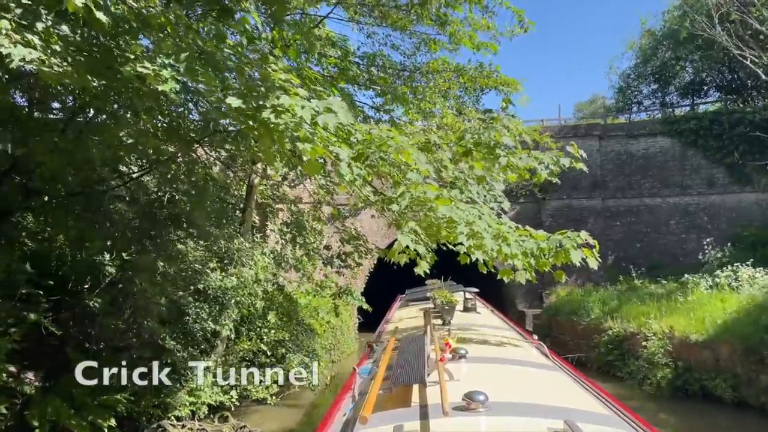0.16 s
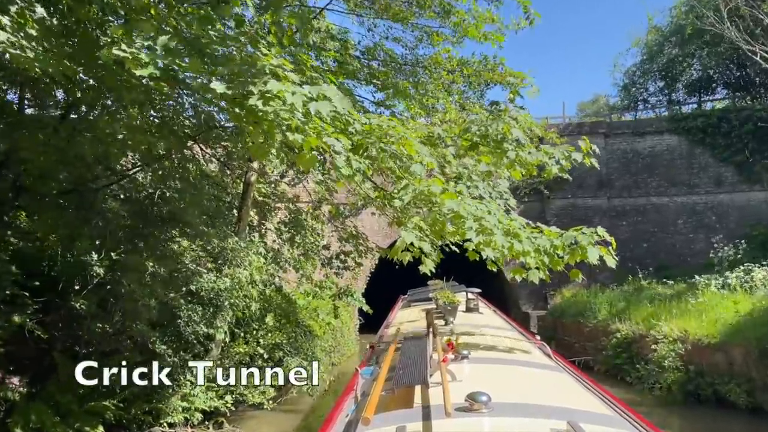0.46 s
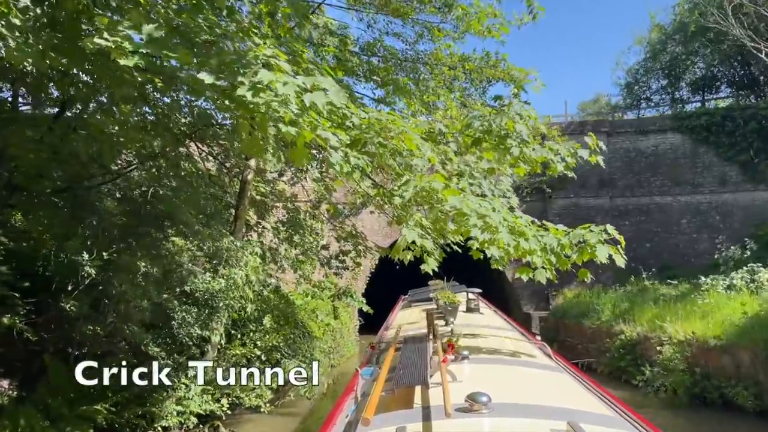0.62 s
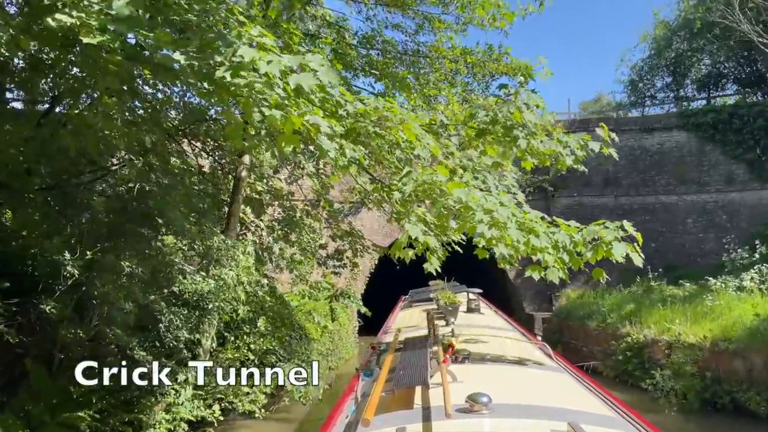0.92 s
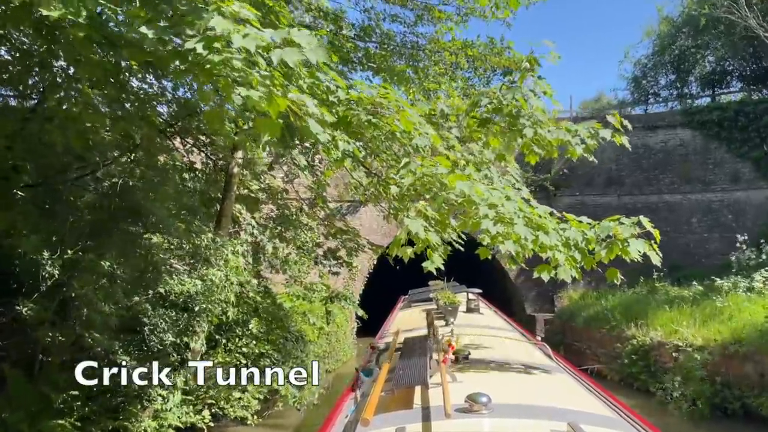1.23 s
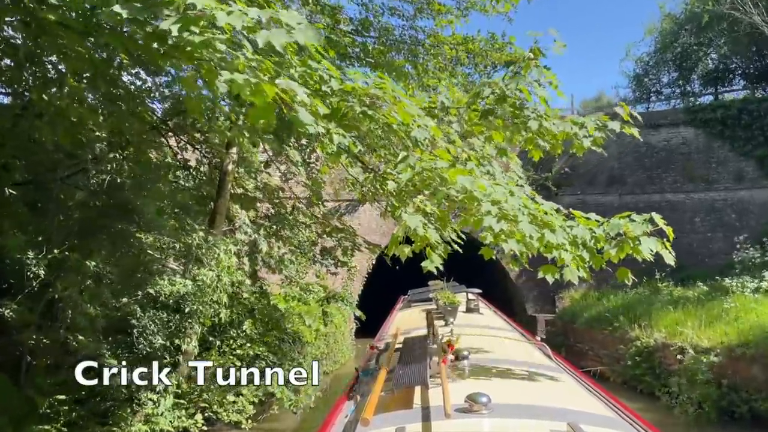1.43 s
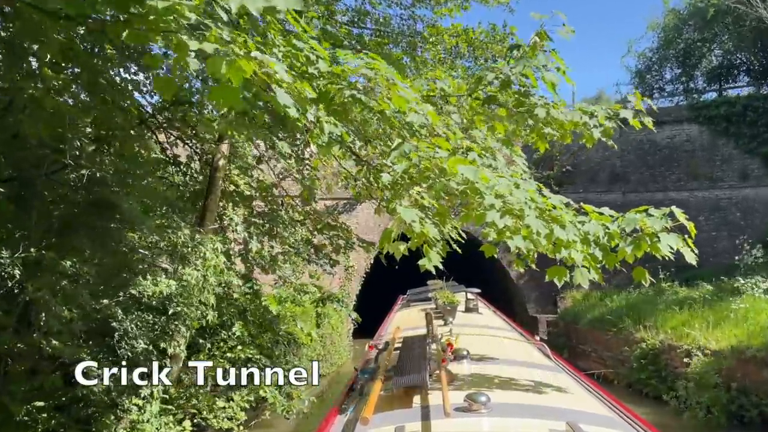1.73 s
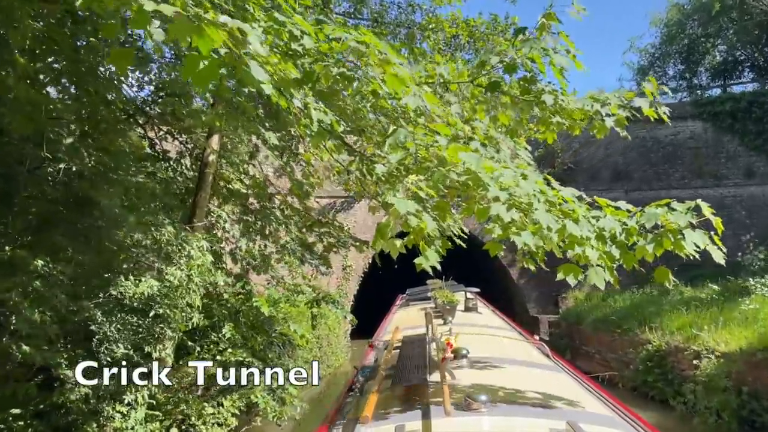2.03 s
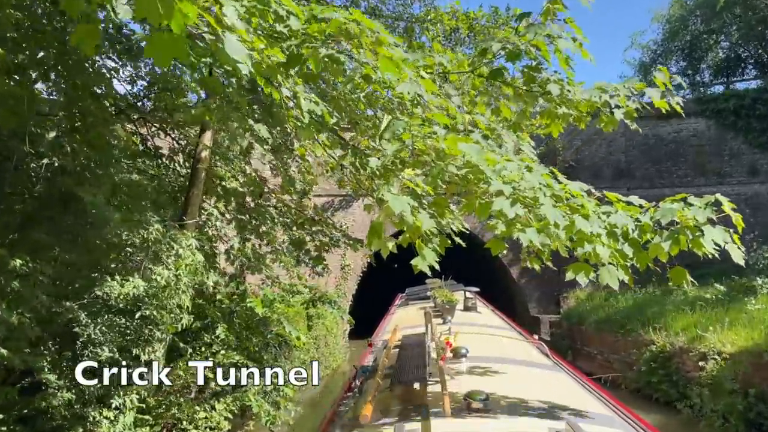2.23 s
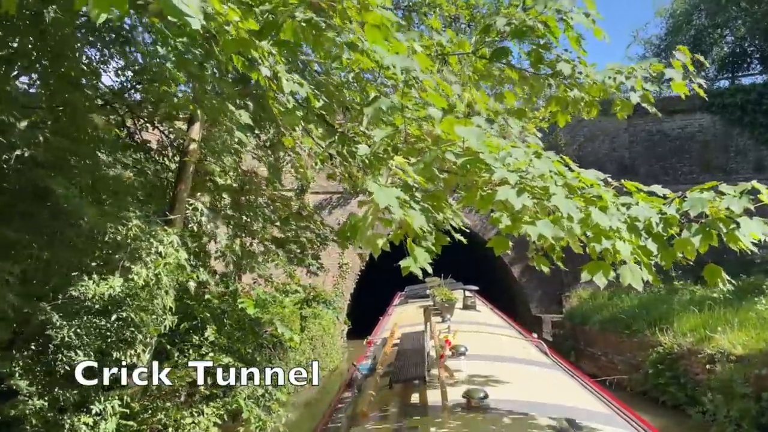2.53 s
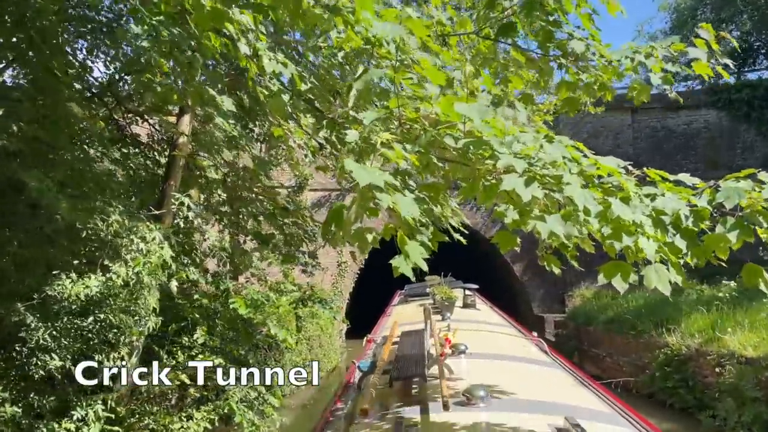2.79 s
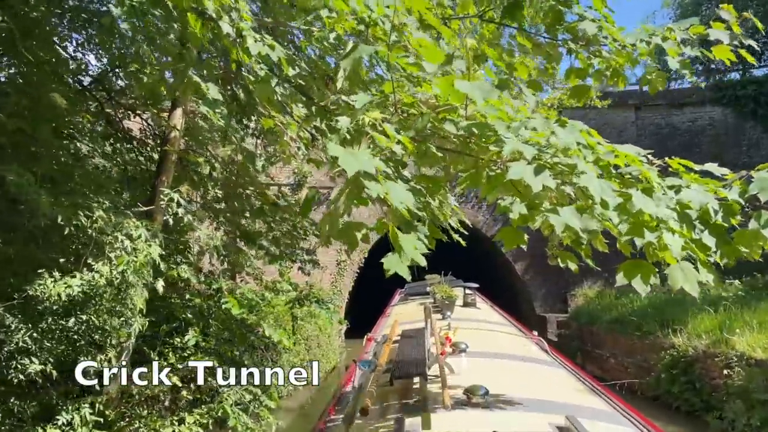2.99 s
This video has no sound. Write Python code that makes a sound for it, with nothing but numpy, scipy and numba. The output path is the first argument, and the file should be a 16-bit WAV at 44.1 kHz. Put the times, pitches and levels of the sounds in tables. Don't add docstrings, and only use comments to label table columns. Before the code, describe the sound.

A canal boat's diesel engine drones low and steady throughout, about ten rapid pops a second, with light irregular metallic ticks. Cooling water gurgles and gulps, busiest around 0.7-1.2 s and again near 2.6 and 3.1 s, over soft hissing wash. From 1.6 s pops harden until 2.4 s, a hollow exhaust ring grows and bass widens. Three faint thin bird whistles come at 2.25, 2.5 and 2.75 s.

```python
import sys
import numpy as np
from scipy import signal
from scipy.fft import rfft, irfft
from scipy.io import wavfile
from scipy.ndimage import uniform_filter1d
from numba import njit

SR = 44100
rng = np.random.default_rng(int(sys.argv[2]) if len(sys.argv) > 2 else 0)


def materialize(psi):
    bounded = np.clip(np.atleast_2d(psi).T, -1, 1)
    quanta = np.round(bounded * 32767).astype(np.int16)
    wavfile.write(sys.argv[1], SR, quanta)


def volts_from_db(level):
    exponent = np.asarray(level, float) / 20
    return 10 ** exponent


N = 138915
CYCLE_HZ, CYCLE_START_S = 9.716, 0.0065

# time in seconds, level in dB.
GURGLE_EFFORT = [(0.0, -43.5), (0.27, -62), (0.31, -43.5), (0.66, -52.5), (0.67, -45), (0.82, -44.5),
                 (0.96, -48), (1.0, -41), (1.13, -47.5), (1.46, -51.5), (1.73, -45), (2.34, -47.5),
                 (3.12, -44), (3.15, -47)]
# time in seconds, wash level in dB, bay level in dB.
NARROWING = [(0, 7.5, -2), (.05, 1.5, 9.5), (.15, -0.5, -2.5), (.27, 1, 3), (1.2, 0.5, 1.5),
             (2.09, 0, -3.5), (2.15, 0, 13), (2.22, 0, 2), (2.35, -1, 5), (2.44, -1, 2.5), (2.55, 0, 9),
             (2.88, -1, -2.5), (3.08, -1, 9.5), (3.15, -1, 3)]


def level(x, db):
    return x * volts_from_db(db) / np.sqrt(np.mean(x ** 2))


def walk(rate):
    hold = int(SR / rate)
    steps = np.repeat(rng.standard_normal(N // hold + 1), hold)
    return 0.82 * uniform_filter1d(uniform_filter1d(steps, hold), hold)[:N]


def curve(points):
    return np.interp(np.arange(N) / SR, *np.array(points).T)


def bell(hz, octaves):
    f = np.arange(1, N // 2 + 2) * SR / N
    return np.exp(-0.5 * (np.log2(f / hz) / octaves) ** 2)


def band(hz, octaves):
    return irfft(rfft(rng.standard_normal(N)) * bell(hz, octaves), N)


@njit
def grains(rows, n):
    out = np.zeros(n)
    for start, gain, hz, t60, glide, rise in rows:
        phase = 0.
        first = int(start * SR)
        for i in range(min(int(t60 * SR), n - first)):
            u = i / SR
            phase += 2 * np.pi * hz * (1 + glide * u / t60) / SR
            out[first + i] += gain * np.sin(phase) * np.exp(-6.9 * u / t60) * min(u / rise, 1.)
    return out


def crank():
    t = np.arange(N) / SR
    hunt_s = 0.00086 * np.cos(2 * np.pi * (t - 1.58) / 1.75)
    return CYCLE_HZ * (t - CYCLE_START_S + hunt_s)


def exhaust(cycle):
    # multiple of the firing rate, level in dB rms.
    boom_orders = [(1, -48.5), (2, -35.5), (3, -52), (4, -49), (5, -55.5), (6, -63)]
    # multiple of the cycle rate, level in dB rms.
    hull_orders = [(7.02, -57), (9.15, -58.5), (10.29, -56.5), (13.04, -57.5), (18.07, -54.5),
                   (88.8, -64.5), (33.8, -60.5), (42.35, -70), (43.85, -59), (55.3, -66), (71.8, -62.5),
                   (84.2, -61.5), (101.2, -67), (102.2, -68.5)]
    # time in seconds, level in dB rms.
    ring_swell = [(0, -65), (1.4, -63), (1.6, -51.5), (2.1, -48), (2.3, -55.5), (2.7, -53.5), (2.95, -50.5),
                  (3.15, -46)]
    pulse_lead_s, pulse_turn = 0.0029, -1.6
    firing = 2 * np.pi * 4 * (cycle + pulse_lead_s * CYCLE_HZ)
    boom = hull = 0
    for k, db in boom_orders:
        scatter_db = np.sqrt(k / 2) * walk(30.16)
        boom = boom + volts_from_db(db + scatter_db) * np.cos(k * firing + pulse_turn)
    for k, db in hull_orders:
        hull = hull + volts_from_db(db + 4.2 * walk(8.95)) * np.cos(2 * np.pi * (k * cycle + rng.random()))
    ring = level(band(233, octaves=0.041), 0) * volts_from_db(curve(ring_swell))
    return np.sqrt(2) * (boom + hull) + ring


def valves():
    # start in seconds, peak level in dB.
    ticks = [(0.0498, -54), (0.1805, -53), (0.2813, -51), (0.3975, -50), (0.5945, -45.5), (0.6983, -50),
             (0.9083, -45), (1.0111, -46), (1.1124, -47), (1.2156, -50), (1.3179, -47), (1.4172, -46.5),
             (1.5938, -53), (1.8294, -54), (1.936, -45.5), (2.0393, -49), (2.1394, -52), (2.2473, -53),
             (2.345, -51), (2.4548, -45), (2.5561, -55), (2.6579, -47), (2.7571, -46), (2.862, -53),
             (2.9672, -50), (3.0684, -48)]
    # pitch in Hz, level in dB, t60 in seconds.
    cover_modes = [(2553, 11, 0.059), (2640, 8.5, 0.035), (2447, 6, 0.039)]
    hits = [(s - 0.007, db - 5, 1) for s, db in ticks]  # s, dB, pitch ratio
    hits += [(s + 0.016, db - 10.5, 1 - 0.033) for s, db in ticks]
    for s in np.arange(CYCLE_START_S + 0.007, N / SR, 1 / (4 * CYCLE_HZ)):
        late, hard = rng.standard_normal(2)
        hits.append((s + 0.001045 * late, -64 + 2.5 * hard, 1))
    rings = []
    for s, db, pitch in hits:
        for hz, mode_db, t60 in cover_modes:
            detuned_hz = hz * (pitch + 0.0025 * rng.standard_normal())
            rings.append((s, volts_from_db(db + mode_db), detuned_hz, t60, -0.02, 0.008))
    return grains(np.array(rings), N)


def pops():
    # time in seconds, level in dB.
    bark = [(0, -14), (1.6, -12), (1.72, 2), (2.4, 3), (2.5, -10)]
    start = np.arange(CYCLE_START_S, N / SR, 1 / CYCLE_HZ) + 0.0015
    chance = rng.standard_normal((len(start), 2))
    hz = 700 * (1 + 0.25 * chance[:, 0].clip(-2, 2))
    db = -31 + 1.5 * chance[:, 1].clip(-1, 1) + np.interp(start, *np.array(bark).T)
    return grains(np.c_[start, volts_from_db(db), hz, 3.5 / hz, 0.5 + 0 * hz, 0.2 / hz], N)


def gurgle():
    # start in seconds, peak level in dB, pitch in Hz, length in cycles.
    gulps = [(.307, -31, 382, 1.6), (0.364, -39, 350, 1.3), (0.674, -38, 288, 1.6), (.768, -23, 600, 2.9),
             (0.79, -22, 353, 1.4), (.895, -22, 550, 2.3), (.929, -27.5, 447, 3.1), (1.014, -26, 400, 3.9),
             (1.05, -27, 770, 2.4), (1.078, -27, 810, 3), (1.176, -30, 700, 2), (2.288, -41, 380, 2.5),
             (2.572, -21.5, 280, 2.5), (2.666, -31, 300, 1.7), (2.695, -25, 400, 2.4),
             (2.841, -36, 320, 2.9), (2.872, -31, 342, 2), (3.038, -20, 503, 2.2), (3.085, -18, 333, 2.2),
             (3.131, -26, 400, 2), (.465, -25.5, 210, 3.2), (.517, -27, 705, 17), (.697, -22, 600, 2.7),
             (0.711, -27, 480, 2.2), (.835, -25, 500, 2.1), (.868, -28, 700, 2.8),
             (0.8036, -17.5, 163, 2.9), (.88, -21.5, 420, 2), (0.997, -27.5, 337, 4.6),
             (1.03, -26, 420, 3.3), (1.06, -22, 600, 2.7), (1.085, -20, 307, 1.7), (1.699, -26, 294, 4.6),
             (1.79, -23.5, 265, 2.5), (2.019, -23, 350, 1.5), (2.135, -26, 500, 2), (2.22, -28, 900, 3),
             (2.241, -36, 300, 1.5), (2.227, -30, 407, 7.8), (2.427, -23, 407, 1.8),
             (2.642, -22.5, 256, 3.6), (3.017, -28, 446, 2.8), (3.057, -24, 600, 2.5),
             (3.109, -22.5, 350, 1.4)]
    bubbles_per_s, bubble_cycles = 420, 1.5
    chance = rng.random((int(bubbles_per_s * N / SR), 4))
    octaves = 0.77 * 3.32 * (chance[:, 1] + chance[:, 3] - 1).clip(-0.6, 0.6)
    hz = 350 * 2 ** octaves
    size = volts_from_db(-1.7 * np.log(chance[:, 2].clip(0.03))) * np.sign(chance[:, 3] - 0.6)
    beat = 2 * np.pi * 8 * CYCLE_HZ
    start = chance[:, 0] * N / SR
    start = (start + 0.35 * np.sin(beat * start) / beat).clip(0)
    small = grains(np.c_[start, size, hz, 2.3 * bubble_cycles / hz, 0.6 + 0 * hz, 0.5 / hz], N)
    outlet = signal.butter(2, 130, "high", fs=SR, output="sos")
    small = level(signal.sosfilt(outlet, small), -46.5)
    big = [(s, volts_from_db(db), f, 1.76 * n / f, 0.1, max(0.5, n / 4) / f) for s, db, f, n in gulps]
    effort = curve(GURGLE_EFFORT)
    return small * volts_from_db(effort - effort.mean()) + grains(np.array(big), N)


def roar(spectrum, db, flicker_db):
    out, swell, effort = 0, walk(6.9), curve(GURGLE_EFFORT)
    effort = effort - effort.mean()
    fade_db = curve(np.array(NARROWING)[:, :2])
    spectrum_hz, spectrum_db = np.array(spectrum).T
    for hz in 45 * 2 ** np.arange(0, 8.4, 1 / 3):
        tilt_db = np.interp(np.log(hz), np.log(spectrum_hz), spectrum_db)
        follow = 0.38 * np.exp(-np.log2(hz / 330) ** 2 / 2)
        motion_db = 0.16 * swell + flicker_db * walk(11.7) + follow * effort
        fade = fade_db * min(hz / 5000, 1)
        out = out + band(hz, 0.26) * volts_from_db(tilt_db + motion_db + fade)
    return level(out, db)


def bay(cycle, to_side):
    # pitch in Hz, width in Hz, centre level in dB, side level in dB.
    bay_modes = [(1038, 56, -58.5, -65.5), (700, 73, -61, -65), (1296, 23, -63.5, -81),
                 (4940, 360, -73.5, -75), (2544, 37, -71, -76), (430, 90, -67, -56.5)]
    throb = 1 + 0.2 * np.cos(2 * np.pi * 8 * cycle)
    swell = volts_from_db(curve(np.array(NARROWING)[:, ::2]))
    out = 0
    for hz, width_hz, mid_db, side_db in bay_modes:
        blown = band(hz, width_hz / hz) * volts_from_db(0.4 * walk(6.03)) * throb
        ring = level(blown, side_db if to_side else mid_db)
        out = out + ring * (swell if 900 < hz < 1200 else 1)
    return out


def bird():
    # start in seconds, length in seconds, start pitch in Hz, end pitch in Hz, level in dB.
    whistles = [
        (2.25, .16, 7150, 7350, -77),
        (2.53, .18, 5200, 5230, -75),
        (2.75, .16, 5250, 5200, -77),
    ]
    t, out = np.arange(N) / SR, 0
    for s, length, hz0, hz1, db in whistles:
        u = np.clip((t - s) / length, 0, 1)
        phase = 2 * np.pi * np.cumsum(hz0 + (hz1 - hz0) * u) / SR
        out = out + volts_from_db(db) * np.sqrt(np.sin(np.pi * u).clip(0)) * np.sin(phase)
    return out


def scene():
    # frequency in Hz, level in dB per Hz.
    centre_roar = [(45, -8), (90, -13), (280, -22), (1050, -24.5), (4800, -42), (7250, -52), (11000, -56.5),
                   (13500, -55.5)]
    # frequency in Hz, level in dB per Hz.
    side_roar = [(100, -11), (500, -6.5), (1080, -7), (3800, -24.5), (6300, -40.5), (7900, -22.5),
                 (10000, -43), (13500, -42.5)]
    # frequency in Hz, share to the left, width in octaves.
    leans = [(2950, .3, 0.91), (600, -0.13, 0.43)]
    cycle, far = crank(), bird()
    mid = exhaust(cycle) + valves() + pops() + gurgle() + far
    mid = mid + roar(centre_roar, -44.5, flicker_db=0.5) + bay(cycle, to_side=False)
    lean_gain = sum(share * bell(hz, octaves) for hz, share, octaves in leans)
    lean = irfft(rfft(mid) * lean_gain, N)
    side = roar(side_roar, -49, flicker_db=-0.3) + bay(cycle, to_side=True) + lean + 1.3 * far
    return np.array([mid + side, mid - side])


def band_limit(x):
    return signal.sosfilt(signal.butter(12, 15720, fs=SR, output="sos"), x)


def record(dry):
    # time in seconds, edge in Hz, bass width in dB.
    width_edge = [(0, 416, -11.5), (1.2, 350, -13), (1.6, 272, -8), (2.0, 174, -4.5), (2.4, 113, -2),
                  (2.65, 61.7, 0.5), (3.15, 40, 4.5)]
    top_hz, thin_hz = 13780, 12300
    fade_in = np.sin(np.pi / 2 * (np.arange(N) / SR / 0.004).clip(0, 1)) ** 2
    mid_side = np.array([dry[0] + dry[1], dry[0] - dry[1]]) / 2 * fade_in
    f, t, (mid, side) = signal.stft(mid_side, SR, nperseg=1024)
    f = f[:, None]
    ragged = np.repeat(rng.standard_normal((len(t), 4)), 4, axis=0)[:len(t)].T
    mid = mid * ((f < 7520 + 250 * (ragged[0] > 1.6)) | (f > 8900))
    mid = mid * (f < top_hz + 60 * ragged[1]) * volts_from_db(-0.006 * (f - 12000).clip(0, 700))
    patches = rng.random((len(f) // 3 + 1, len(t) // 2 + 1))
    patches = np.repeat(np.repeat(patches, 3, axis=0), 2, axis=1)[:len(f), :len(t)]
    mid = mid * (patches > 0.5 * (f - thin_hz) / (top_hz - thin_hz))
    s, edge_hz, bass_db = np.array(width_edge).T
    side = side * (f > np.interp(t, s, edge_hz) * (1 + 0.12 * ragged[2]))
    side = side * volts_from_db(np.interp(t, s, bass_db) * (f < 600))
    side = side * ((f < 10450 + 150 * ragged[3]) | (f > 12900 + 200 * abs(ragged[0])))
    side = side * (f < 15720 - 600 * (ragged[1] > 0.7))
    mid, side = signal.istft(np.array([mid, side]), SR, nperseg=1024)[1][:, :N]
    return band_limit(np.array([mid + side, mid - side]))


dry = scene()
out = record(dry)
materialize(out)
```